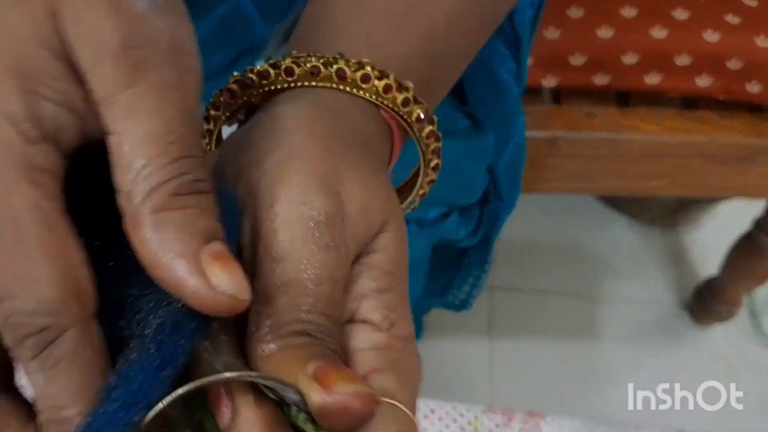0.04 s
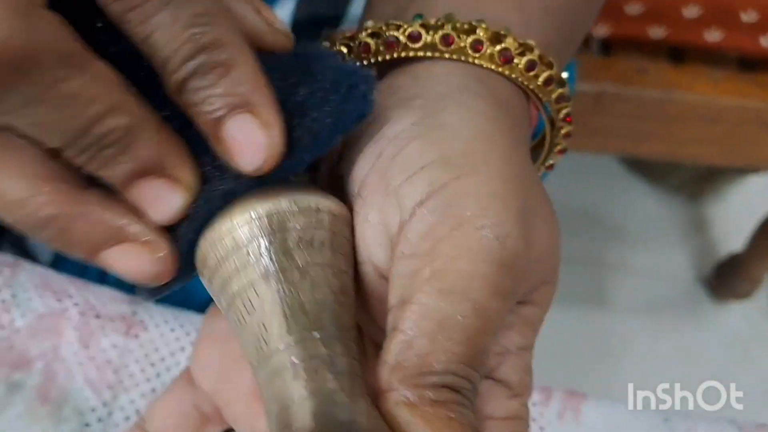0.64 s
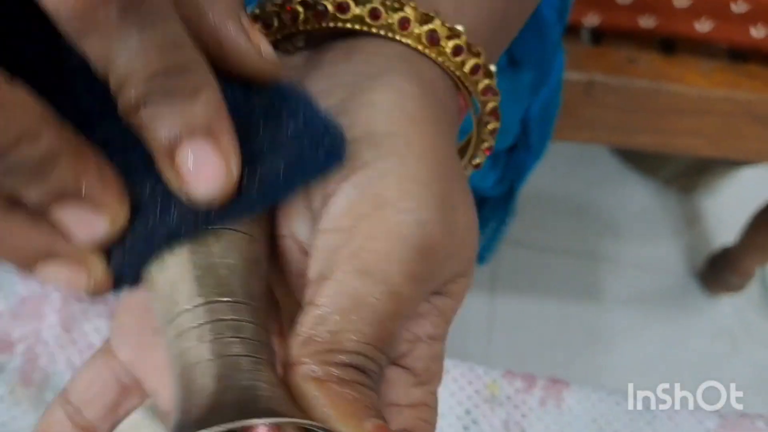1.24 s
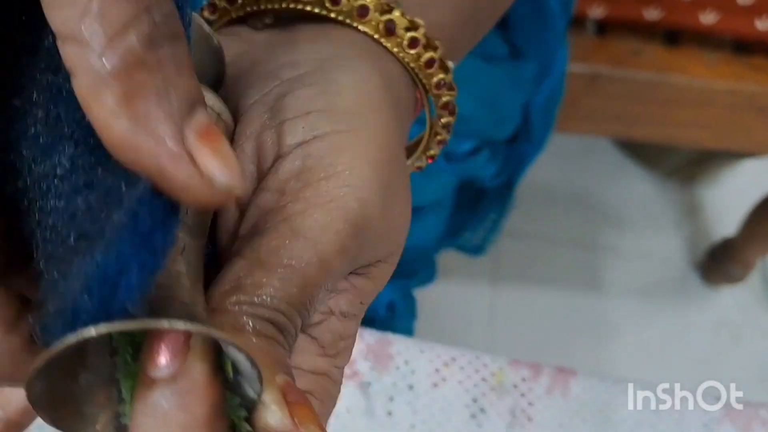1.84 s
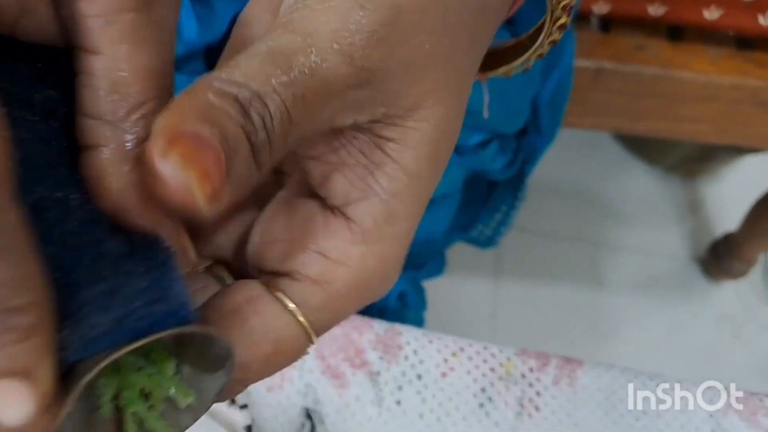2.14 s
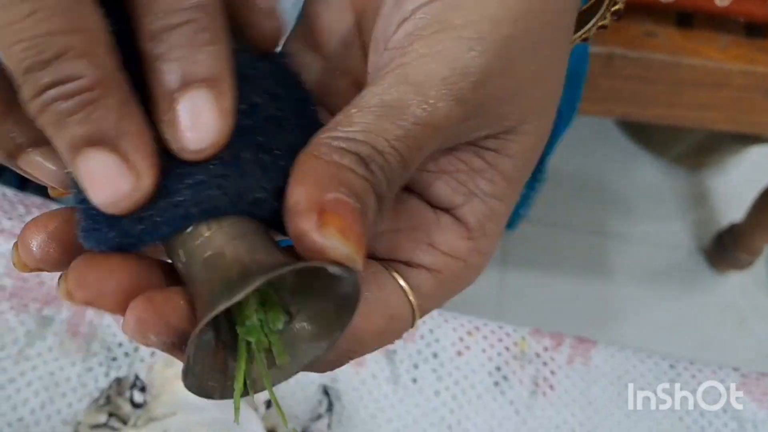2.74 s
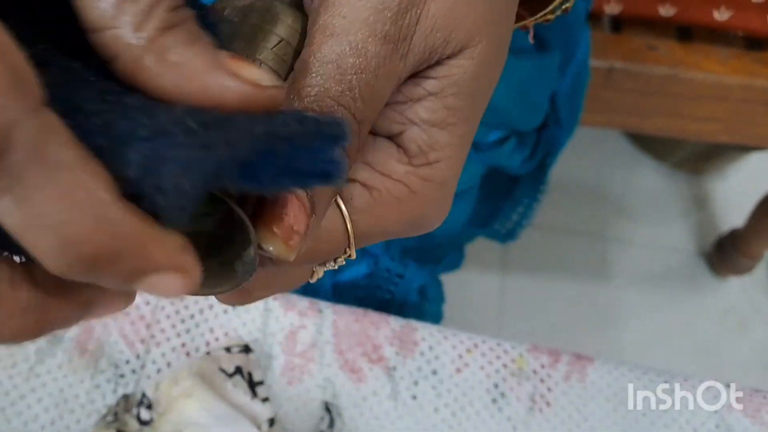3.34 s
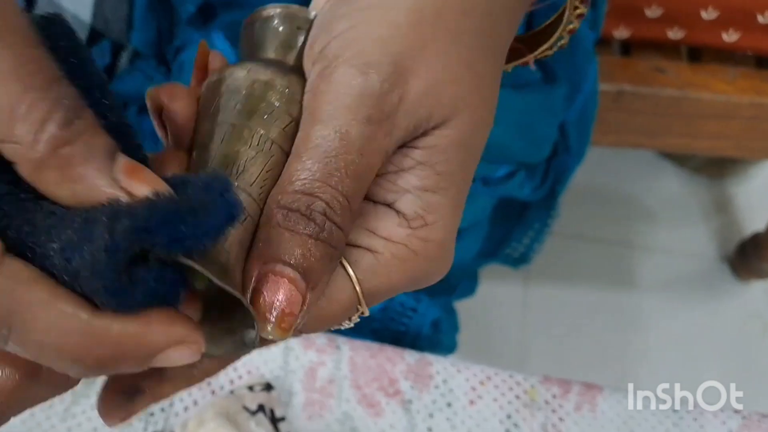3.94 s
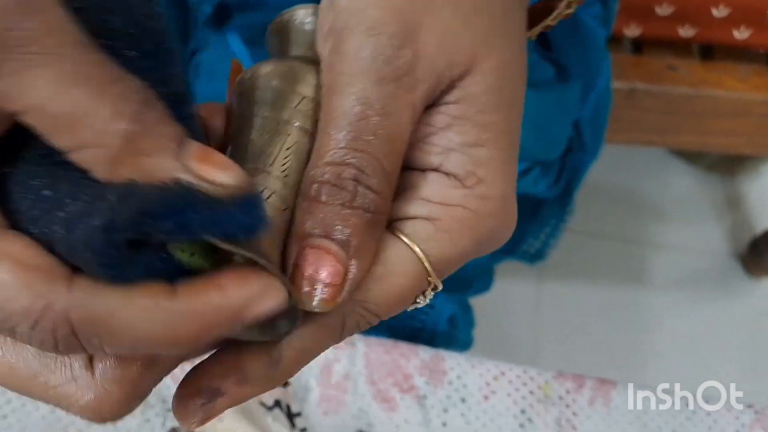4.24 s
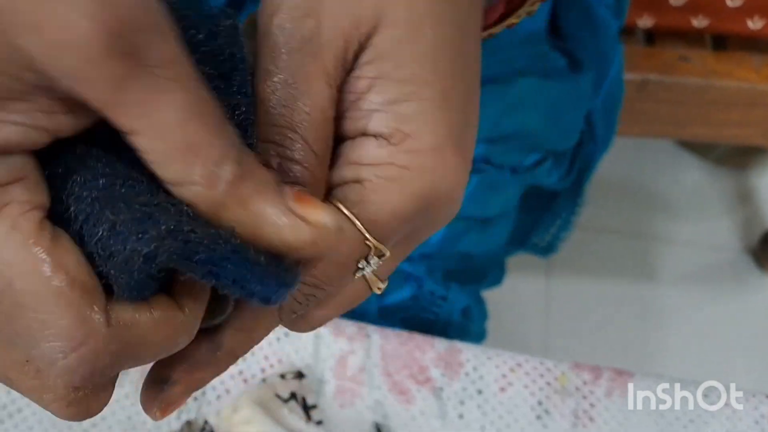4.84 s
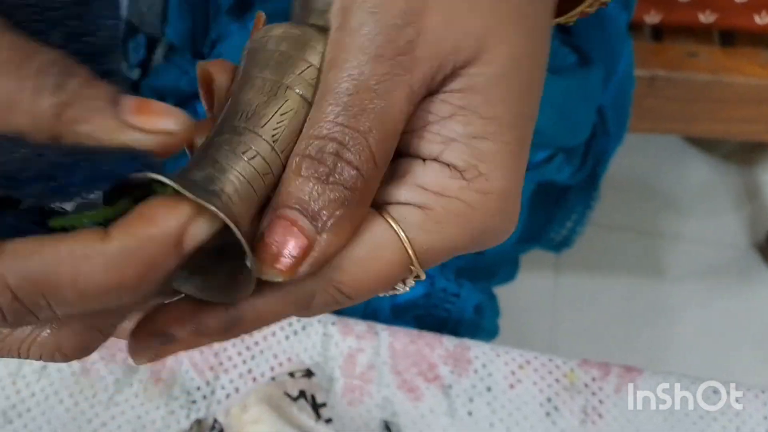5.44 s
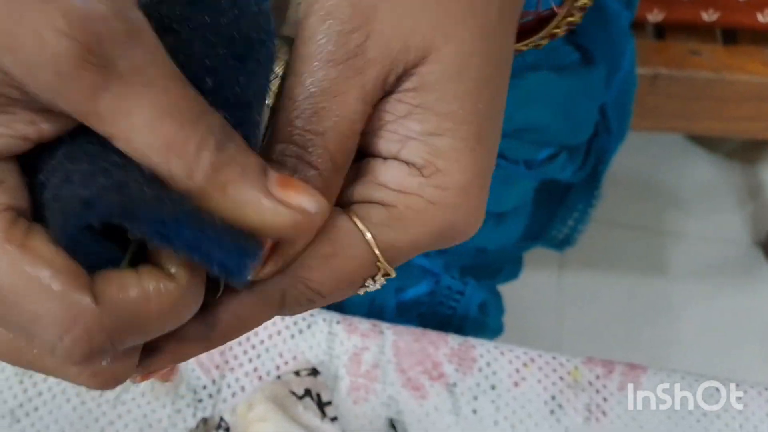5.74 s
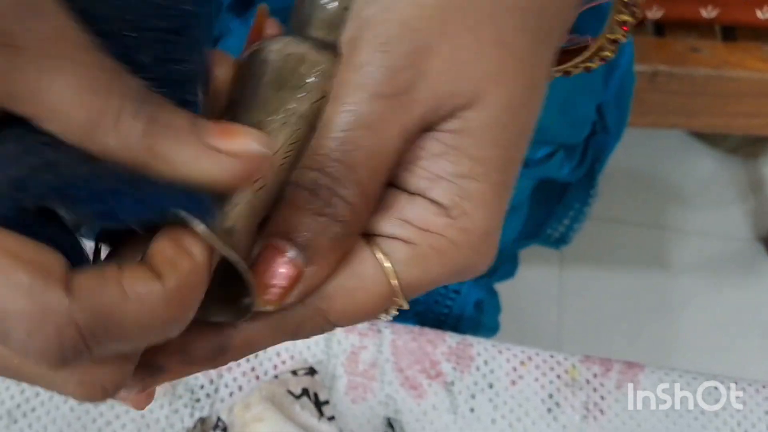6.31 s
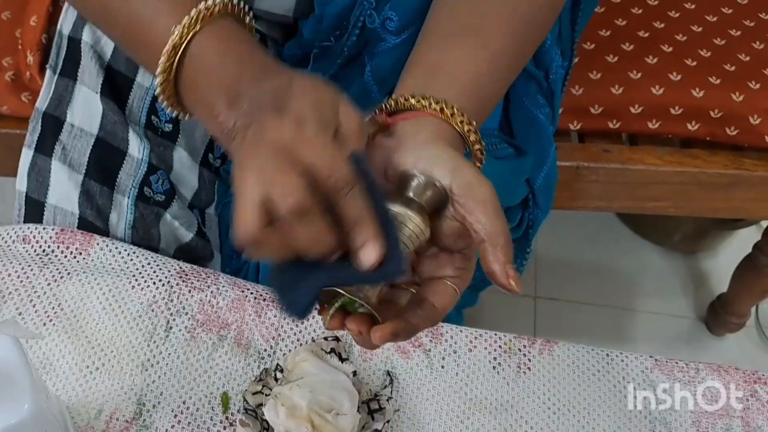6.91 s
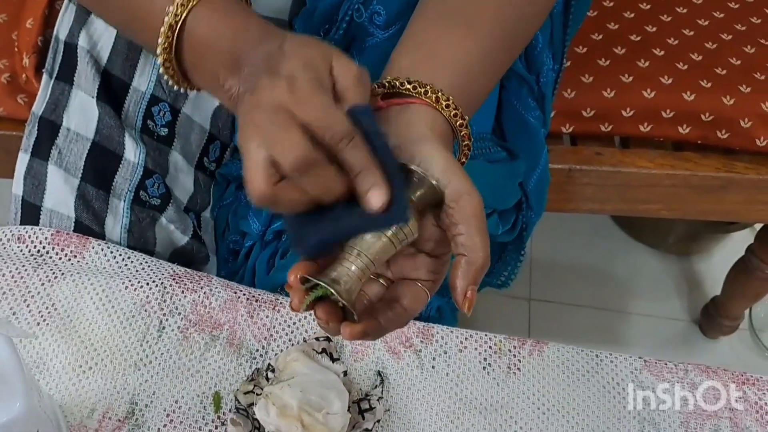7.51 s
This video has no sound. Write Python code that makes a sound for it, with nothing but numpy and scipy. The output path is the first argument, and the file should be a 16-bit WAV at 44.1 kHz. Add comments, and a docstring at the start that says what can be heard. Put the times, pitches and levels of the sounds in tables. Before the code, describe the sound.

A scouring pad rubs quickly back and forth on a small brass vase, close by and slightly left, about six uneven strokes a second throughout. Each stroke is a bright, scratchy hiss with crackling snags, a thin metallic ring and a faint hollow hoot. The first two seconds are loudest, with small pops from the vase's mouth around 0.8, 1.1 and 1.8 seconds. Near 2.1 seconds the rubbing eases and rings higher on the neck. From 3.3 seconds it works the rim, with a cluster of snags and soft pops until about 4.3. A faint drip plinks at 4.9 seconds, the room's rumble swells briefly, and the strokes firm up. At 6.5 seconds lighter rubbing moves to the belly with a lower ring. Two clearer drips fall in quick succession near 7 seconds. A fan's low hum and rumble fill the small room until the end, around 7.5 seconds.

```python
"""A scouring cloth is rubbed quickly back and forth on a small hand-held brass vase, close by, while a fan
drones in the small room. From the start the fibres hiss, crackle and snag on the metal, and the air in the vase
hoots faintly, popping when the cloth plugs or leaves the mouth. The ring of the brass changes as the cloth
moves from the waist to the neck (2.1 s) and the rim (3.3 s). A drip plinks at 4.9 s and a soft, deep swell
sounds. The cloth moves to the belly (6.5 s), and two more drips follow near 7 s."""
import sys
import numpy as np
from scipy import signal
from scipy.fft import rfft, irfft
from scipy.io import wavfile
from scipy.ndimage import uniform_filter1d

SR = 44100
rng = np.random.default_rng(int(sys.argv[2]) if len(sys.argv) > 2 else 0)


def transcribe(signal):
    """Save signal, clipped to [-1, 1], as a 16-bit WAV file at the path in sys.argv[1]."""
    frames = np.atleast_2d(signal).T
    limited = np.clip(frames, -1, 1)
    pcm = np.round(limited * 32767).astype(np.int16)
    wavfile.write(sys.argv[1], SR, pcm)


N = 333837
TIME = np.arange(N) / SR
# The times in seconds when the cloth, which starts on the waist, moves to the neck, rim and belly.
MOVE_TIMES = [2.13, 3.27, 6.47]


def amp(db):
    """Turns decibels into a gain to multiply by."""
    return 10 ** (np.asarray(db) / 20)


def unit(x):
    """Scales a signal to an average (rms) level of 1."""
    return x / np.sqrt(np.mean(x ** 2) + 1e-20)


def read(points, hz):
    """Reads between the rows of a table, on a logarithmic frequency scale."""
    row_hz, value = np.transpose(points)
    return np.interp(np.log(hz + 1), np.log(row_hz + 1), value)


def add(mix, start_s, sound):
    """Adds a sound into the mix at the given time."""
    part = mix[..., round(start_s * SR):][..., :sound.shape[-1]]
    part += sound[..., :part.shape[-1]]


def sides(lean_db):
    """Left and right gains with the same total power; a positive lean favours the left."""
    pair = amp(np.array([lean_db, -lean_db]) / 2)
    return pair / np.sqrt(np.mean(pair ** 2, axis=0))


def wander(rate_hz):
    """A smooth random curve of level 1 that changes at up to about the given rate."""
    hz = np.fft.rfftfreq(N, 1 / SR)
    return unit(irfft(rfft(rng.standard_normal(N)) / (1 + (hz / rate_hz) ** 4), N))


def tone(hz, wander_hz):
    """A pure tone of level 1 whose pitch drifts."""
    return unit(np.sin(2 * np.pi * np.cumsum(hz + wander_hz * wander(4.62)) / SR))


def resonate(x, hz, width_hz):
    """Lets through a narrow band around a moving pitch."""
    turn = np.exp(2j * np.pi * np.cumsum(hz) / SR)
    decay = np.exp(-np.pi * width_hz / SR)
    return 2 * (turn * signal.lfilter([1 - decay], [1, -decay], x / turn)).real


def hand_strokes(rest_db=-58, lag_db=2.5, press_db=2, release_s=0.048, fizz_per_rasp=0.35):
    """Each stroke swells and fades; the hand lands lightly and bears down later, which adds rasp."""
    # Strokes of the cloth. Each row: start in seconds, length in seconds, level in dB, rasp in dB.
    strokes = [(0, 0.079, -35.5, -10), (0.121, 0.15, -28.5, 1.5), (0.324, 0.096, -28, 4.5),
               (0.479, .16, -28, 5), (0.719, .082, -24.5, 6), (0.876, 0.12, -30.5, 5.5),
               (1.065, 0.07, -23.5, 3), (1.213, 0.14, -28.5, 4.5), (1.419, .058, -22.5, 1),
               (1.571, 0.16, -32, 0.5), (1.768, 0.13, -33.5, 6.5), (1.936, 0.086, -45, -3),
               (2.19, 0.053, -43.5, -22), (2.252, .119, -36.5, -5), (2.398, 0.092, -44.5, -3),
               (2.642, 0.057, -37.5, 2), (2.817, 0.11, -36, -0.5), (2.955, 0.054, -34, -6),
               (3.148, 0.073, -38.5, -7.5), (3.305, 0.21, -38, -5), (3.61, 0.09, -36, 1.5),
               (3.761, 0.16, -36, -0.5), (3.95, .12, -45, -6), (4.045, 0.083, -37.5, 8.5),
               (4.197, 0.15, -34.5, -1.5), (4.359, 0.22, -43.5, 4), (4.672, 0.073, -36.5, -4.5),
               (4.792, 0.1, -39.5, -8), (4.843, 0.07, -31, 3.5), (5.05, 0.098, -31.5, -1.5),
               (5.213, 0.089, -32, -1.5), (5.415, 0.091, -33, -2), (5.583, 0.12, -32, -3),
               (5.805, 0.079, -32, -9.5), (5.951, 0.062, -39.5, -24), (5.99, 0.097, -32.5, -3),
               (6.167, .098, -34.5, -8.5), (6.325, 0.11, -33.5, -1), (6.487, 0.04, -35, 4.5),
               (6.526, 0.091, -42, 1), (6.597, 0.096, -38.5, -6.5), (6.694, 0.17, -40.5, -1.5),
               (6.924, 0.13, -36.5, -4), (7.098, 0.15, -35.5, 2.5), (7.272, 0.18, -44.5, -1.5),
               (7.501, 0.099, -40, -4.5)]
    # The grip at the waist, neck, rim and belly. Each row: fizz in dB, lean to the left in dB,
    # stroke length in seconds at which the swell begins to flatten into a hold.
    grips = [(4.5, -3, 0.046), (2.5, 1, 0.064), (5.5, -2.4, 0.041), (4, 0.2, 0.076)]
    t = TIME[::40]
    start, length, db, rasp_db = np.transpose(strokes)[:, :, None]
    fizz_db, lean_db, flatten_s = np.transpose(grips)[:, np.searchsorted(MOVE_TIMES, start)]
    fall = np.minimum(release_s, 0.79 * length)
    rise = length - fall
    peak = start + rise
    progress = (t - peak) / np.where(t < peak, rise, fall)  # -1 as a stroke starts, 1 as it ends
    squareness = length / flatten_s * np.where(t < peak, 1.15, 1.09)
    fade_db = np.minimum(10 * abs(progress) ** squareness, 150)
    power = amp(db - fade_db) ** 2
    force = np.sqrt(power.sum(0) + amp(rest_db) ** 2)
    progress = np.clip(progress, -1, 1)
    rasp = rasp_db + lag_db * progress - press_db * progress ** 2
    fizz = fizz_db + fizz_per_rasp * rasp_db
    # where strokes overlap, the louder one counts for more
    blended = [(power * trait).sum(0) / power.sum(0) for trait in (rasp, fizz, lean_db)]
    return [np.interp(TIME, t, curve) for curve in [force] + blended]


def fibres(slips_per_s=5000, spread_db=3.5, smooth_hiss=0.57):
    """Fibres slip on the metal: countless tiny clicks of uneven size over a smooth hiss."""
    size = amp(spread_db * np.minimum(rng.exponential(1, N), 5))
    slips = size * rng.choice([-1, 1], N) * (rng.random(N) < slips_per_s / SR)
    return unit(unit(slips) + smooth_hiss * rng.standard_normal(N))


def brass(drive, force, rasp_db, fizz_db, flicker_db=3.0, grip_depth=0.55, wake_db=-56):
    """Each touch wakes the vase's ringing tones, which the shifting fingers damp and release."""
    # The sound of cloth on metal. Each row: frequency in Hz, strength there in dB.
    friction = [(150, -7.5), (450, -12), (720, -15.5), (1200, -7.5), (1900, -15), (2600, -10), (3400, -8),
                (5000, -5.5), (7000, -1), (8300, -0.5), (9900, -5), (12000, -0.5), (14000, -0.5),
                (15700, -9)]
    # The vase's ringing tones. Each row: pitch in Hz, width in Hz, then the boost in dB
    # when rubbed on the waist, neck, rim and belly.
    ringing_tones = [(1054, 160, 5.5, -3, 3, 12.5), (2110, 420, 1, 0.5, 7, 7), (3880, 490, 1, 0.5, 4.5, 5),
                     (6570, 710, -0.5, 1.5, 8.5, 0.5), (7240, 320, 2, 13, 5, 3),
                     (7730, 230, 8.5, 6, 5, -0.5), (8590, 135, -11, 13, -2, -11),
                     (8920, 310, 6, -3, 6.5, -3), (11140, 310, 0.5, 11, 5, 4),
                     (11700, 300, -3.5, 0.5, 4, -2), (13400, 410, -3.5, 9.5, -5, -2),
                     (15550, 510, 8, 16.5, 7, 14.5)]
    # The hands shade one side. Each row: frequency in Hz, then the lean to the left in dB
    # at the waist, neck, rim and belly.
    hand_shade = [(1160, 8.5, 3, 5.5, 3.5), (2060, 2.5, -4, 1, -3.5), (3100, 15.5, 7, 11.5, 4.5),
                  (4230, 8, 11, 4.7, 5.5), (6600, 8, 5, 8.8, 3), (8400, 11, 6, 8.1, 3), (11000, 3, 0, 1, 0),
                  (15000, 3, 0, 3, -2)]
    frames = dict(fs=SR, nperseg=512, noverlap=384)
    hz, t, spectrum = signal.stft(drive, **frames)
    place = np.searchsorted(MOVE_TIMES, t)
    colour_db = read(friction, hz)[:, None]
    awake = np.interp(t, TIME, force / np.hypot(force, amp(wake_db)))
    for ring_hz, width_hz, *boost_db in ringing_tones:
        fingers = np.tanh(unit(uniform_filter1d(rng.standard_normal(len(t)), size=24)))
        freedom = awake * (1 + grip_depth * fingers)
        peak = 1 / (1 + (2 * (hz - ring_hz) / width_hz) ** 2)
        colour_db = colour_db + np.outer(peak, np.array(boost_db)[place] * freedom)
    # hard pressure adds a low rasp, fast contact a high fizz
    colour_db += np.outer(1 / (1 + (hz / 4500) ** 4), np.interp(t, TIME, rasp_db))
    colour_db += np.outer(1 - 1 / (1 + (hz / 10000) ** 8), np.interp(t, TIME, fizz_db))
    flicker = uniform_filter1d(rng.standard_normal(colour_db.shape), size=3, axis=0)
    flicker = unit(uniform_filter1d(flicker, size=16, axis=1))
    gain = amp(colour_db + flicker_db * flicker)
    gain /= np.sqrt(np.mean(gain ** 2, axis=0))
    # this phase makes the metal ring after each slip, never before it
    mirrored = np.vstack([gain, gain[-2:0:-1]])
    phase = -signal.hilbert(np.log(mirrored), axis=0).imag[:len(hz)]
    shade_hz, *leans = np.transpose(hand_shade)
    shade_db = np.transpose([read(list(zip(shade_hz, lean)), hz) for lean in leans])[:, place]
    return signal.istft(spectrum * gain * np.exp(1j * phase) * sides(shade_db), **frames)[1][:, :N]


def hollow_air(slips, level, open_width_hz=55, covered_width_hz=130, outer_width_hz=300):
    """Air in the vase hoots under the slips and rings at each pop; cloth on the rim damps the hoot."""
    # The hoot, lower and weaker while the cloth covers the mouth.
    # Each row: time in seconds, pitch in Hz, level in dB relative to the stroke.
    hoot_path = [(0, 915, -18), (1.85, 909, -16), (2.0, 965, -5.5), (2.2, 987, -27), (3.45, 954, -18),
                 (3.8, 878, -14.5), (4.1, 858, -10.5), (4.28, 694, -22), (4.7, 676, -18.5), (5.3, 637, -31),
                 (6.35, 635, -37), (6.48, 942, -31), (6.8, 972, -10), (7.57, 950, -20.5)]
    times, *columns = np.transpose(hoot_path)
    hz, hoot_db = (np.interp(TIME, times, column) for column in columns)
    free = unit(resonate(resonate(slips, hz, open_width_hz), hz, outer_width_hz))
    covered = unit(resonate(resonate(slips, hz, covered_width_hz), hz, outer_width_hz))
    on_rim = (TIME > MOVE_TIMES[1]) & (TIME < MOVE_TIMES[2])
    return level * amp(hoot_db) * np.where(on_rim, covered, free) + mouth_pops(hz)


def scrubbing(stereo_spread=1.88, judder_db=2.48, hiss_db=1.5, snag_db=3.0, hollow_db=-1):
    """The strokes drag the fibres over the metal and stir the air inside the vase."""
    force, rasp_db, fizz_db, lean_db = hand_strokes()
    force = force * amp(judder_db * np.tanh(wander(rate_hz=55)))  # the cloth judders as it slides
    shared_slips = fibres()
    slips = np.array([unit(shared_slips + stereo_spread * fibres()) for _ in range(2)])
    hiss = amp(hiss_db) * force * slips * sides(lean_db)
    metal = brass(hiss + amp(snag_db) * snags(force), force, rasp_db, fizz_db)
    air = hollow_air(shared_slips, force * amp(hollow_db))
    return metal + air * sides(lean_db=4.0)[:, None]


def off_centre(pair, delay_samples=8):
    """The vase is held to the left until the belly is rubbed, so its sound reaches the right later."""
    left, right = pair
    return np.array([left, np.where(TIME < MOVE_TIMES[-1], np.roll(right, delay_samples), right)])


def nearby_echoes(pair, count=6, echo_db=-17):
    """Hands, lap and table throw the sound back within milliseconds, which colours the hiss."""
    out = pair.copy()
    for side in range(2):
        for delay_s in rng.uniform(.001, .012, count):
            add(out[side], delay_s, amp(echo_db) * rng.choice([-1, 1]) * pair[side])
    return out / np.sqrt(1 + count * amp(echo_db) ** 2)


def room_echoes(pair, gap_s=0.014):
    """The room returns a dense wash of echoes whose treble dies first."""
    # How long the room rings. Each row: frequency in Hz, seconds to fade by 60 dB.
    fade_times = [(200, 0.89), (1000, 0.45), (2000, 0.58), (6000, 0.33), (15000, 0.21)]
    echoes = rng.standard_normal((2, SR)) * (rng.random((2, SR)) < .1) * (TIME[:SR] > gap_s)
    hz, t, spectrum = signal.stft(echoes, SR, nperseg=256)
    fade = amp(-60 * t / read(fade_times, hz)[:, None])
    tail = signal.istft(spectrum * fade, SR, nperseg=256)[1]
    return signal.fftconvolve(pair, tail / np.linalg.norm(tail[0]), axes=1)[:, :N]


def air_rumble(level_db=-46.5, drift_db=2.15):
    """Moving air fills the room with a low, slightly uneven rumble."""
    # The colour of the rumble. Each row: frequency in Hz, strength there in dB.
    colour = [(20, -29), (32, -14), (43, -2), (58, -5), (68, -7), (80, -3.5), (102, -4), (122, -11),
              (146, -4.5), (175, -14), (200, -11), (420, -30), (1000, -40), (3000, -45), (15000, -43)]
    # How alike left and right are. Each row: frequency in Hz, likeness from 0 to 1.
    likeness = [(30, 0.34), (150, 1), (350, 0.3), (1000, 0.68), (4000, 0.095)]
    hz = np.fft.rfftfreq(N, 1 / SR)
    left, other = rfft(rng.standard_normal((2, N)))
    same = read(likeness, hz)
    right = same * left + np.sqrt(1 - same ** 2) * other
    air = unit(irfft(np.array([left, right]) * amp(read(colour, hz)), N))
    return air * amp(level_db + drift_db * wander(rate_hz=2.9)) * sides(lean_db=2.5)[:, None]


def fan(waver=0.26, throb_hz=56.5, throb_depth=0.45):
    """A fan drones: a wavering hum over a deep throb."""
    # The tones of the hum. Each row: pitch in Hz, width of its drift in Hz, level in dB.
    hum_tones = [(102.1, 1.97, -55), (188.3, 2.01, -56.5), (300.7, 12.3, -71.5)]
    # The strength of the throb. Each row: time in seconds, level in dB.
    throb_levels = [(0, -52.5), (1.3, -45.5), (1.85, -43.5), (2.6, -49.5), (3.05, -45), (4.3, -42.5),
                    (5.6, -53), (6.1, -47.5), (7.57, -45)]
    hum = sum(amp(db) * unit((1 + waver * wander(rate_hz=4.1)) * tone(hz, width / 2))
              for hz, width, db in hum_tones)
    throb = unit((1 + throb_depth * wander(rate_hz=3)) * tone(throb_hz, wander_hz=1.66))
    throb *= amp(np.interp(TIME, *np.transpose(throb_levels)))
    return hum * sides(lean_db=2.5)[:, None] + throb * sides(lean_db=1)[:, None]


def snags(force, band_hz=(3000, 12500), catches_per_s=6, catch_db=8, catch_decay_s=0.0016):
    """Fibres catch and let go in short, bright bursts; lesser, random catches follow the force."""
    # The main snags. Each row: start in seconds, level in dB, decay time in seconds.
    main_snags = [(0.07, -24, 0.00091), (0.118, -31.5, 0.0043), (.335, -15.5, 0.0016), (.3476, -16, 0.0022),
                  (0.363, -27, 0.002), (0.73, -17.5, 0.0038), (0.743, -11, 0.00055), (1.782, -13, 0.002),
                  (1.798, -14, 0.0022), (1.8018, -21, 0.0017), (2.752, -30, 0.0018), (2.893, -27, 0.0008),
                  (3.307, -29.5, .0042), (3.3167, -29, .0055), (3.3277, -24, .0025), (3.364, -28, 0.0037),
                  (3.3766, -24, 0.0052), (3.4375, -26, 0.0019), (3.4916, -21, 0.0022),
                  (3.5748, -34.5, .003), (3.8667, -17.5, 0.00072), (4.2143, -28, 0.0031),
                  (4.8767, -21.5, .001), (5.244, -29, .002), (5.496, -21.5, .0011), (5.579, -33.5, .004),
                  (5.9863, -18, 0.0025), (6.342, -23, 0.0021), (7.1257, -28, .001)]
    bursts, t = np.zeros((2, N)), TIME[:800]
    caught = np.flatnonzero(rng.random(N) < catches_per_s / SR)
    catches = [(TIME[i], catch_db + 20 * np.log10(force[i]), catch_decay_s) for i in caught]
    for start_s, db, decay_s in main_snags + catches:
        add(bursts, start_s, amp(db) * np.exp(-t / decay_s))
    crackle = bursts * rng.standard_normal((2, N)) * sides(lean_db=1)[:, None]
    return signal.lfilter(*signal.butter(1, band_hz, "band", fs=SR), crackle)


def mouth_pops(air_hz, attack_s=0.002, fade_s=0.051):
    """The cloth plugs or leaves the mouth, and the air inside rings briefly at its own pitch."""
    # The pops. Each row: start in seconds, level in dB.
    pops = [(.752, -25.5), (1.087, -22.5), (1.783, -28), (3.439, -31), (3.497, -30.5), (3.680, -32.5),
            (3.784, -30.5), (3.865, -28.5), (4.131, -30), (4.314, -34), (6.499, -31.5)]
    out, t = np.zeros(N), TIME[:SR // 8]
    attack = 1 - np.exp(-(t / attack_s) ** 2)
    for start_s, db in pops:
        hz = np.interp(start_s, TIME, air_hz)
        add(out, start_s, amp(db - 60 * t / fade_s) * attack * np.sin(2 * np.pi * hz * t))
    return out


def drips(attack_s=0.0014):
    """Each drip rings one small bubble."""
    # The drips. Each row: start in seconds, level in dB, pitch in Hz, seconds to fade by 60 dB.
    bubbles = [(4.895, -36.5, 2260, 0.036), (7.018, -17, 1860, 0.039), (7.0928, -19, 1620, 0.0087)]
    out, t = np.zeros(N), TIME[:SR // 5]
    attack = 1 - np.exp(-(t / attack_s) ** 2)
    for start_s, db, hz, fade_s in bubbles:
        add(out, start_s, amp(db - 60 * t / fade_s) * attack * np.sin(2 * np.pi * hz * t))
    return np.array([out, out])


def low_swell(peak_s=5, half_length_s=0.1, hz=43.5, level_db=-37.5):
    """A soft, deep swell rises once, as a short low tone."""
    swell = amp(level_db) * np.exp(-((TIME - peak_s) / half_length_s) ** 2)
    return swell * tone(hz, wander_hz=1.66) * sides(lean_db=1)[:, None]


def scene(scrub_echo_db=-17, drip_echo_db=-7.5):
    """Close scrubbing and farther drips in one room, over the rumble and the fan."""
    scrub = nearby_echoes(off_centre(scrubbing()))
    plinks = drips()
    echoes = room_echoes(amp(scrub_echo_db) * scrub + amp(drip_echo_db) * plinks)
    return scrub + plinks + echoes + air_rumble() + fan() + low_swell()


def record(dry, top_hz=15720):
    """Cuts off the very highest treble."""
    low_pass = signal.firwin(401, top_hz, window=("kaiser", 9), fs=SR)
    return signal.oaconvolve(dry, low_pass[None], "same")


dry = scene()
out = record(dry)
transcribe(out)
```